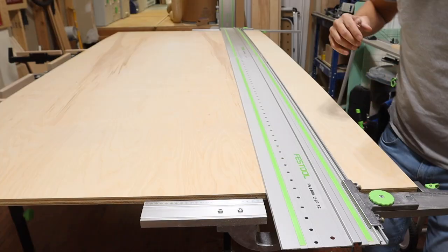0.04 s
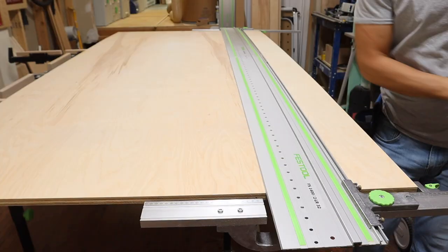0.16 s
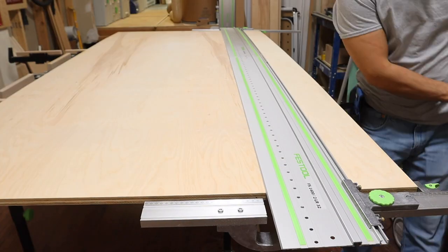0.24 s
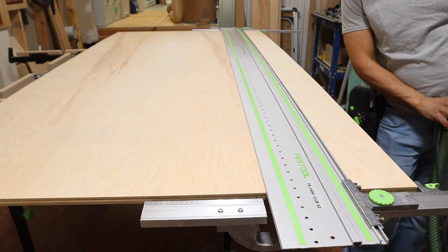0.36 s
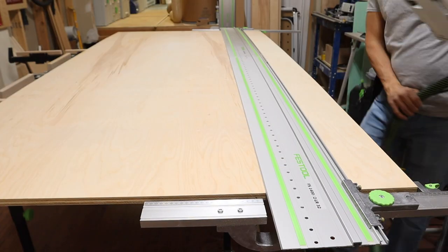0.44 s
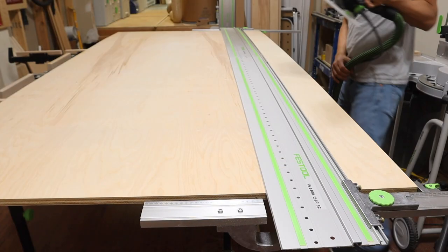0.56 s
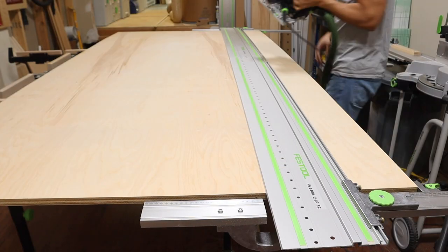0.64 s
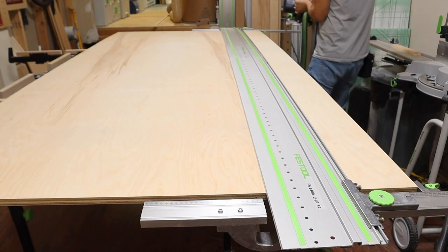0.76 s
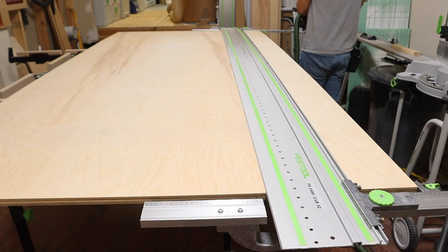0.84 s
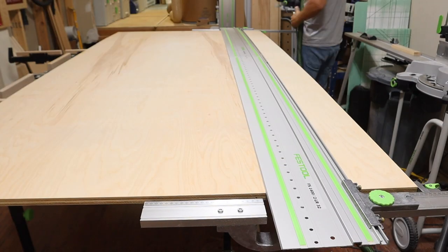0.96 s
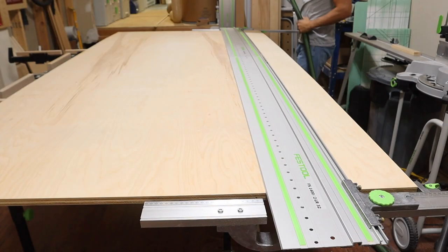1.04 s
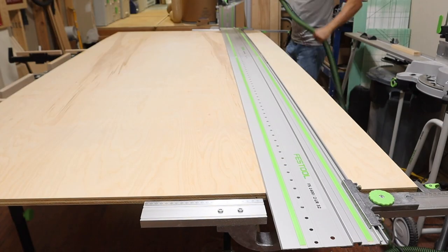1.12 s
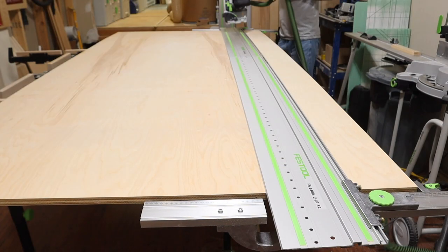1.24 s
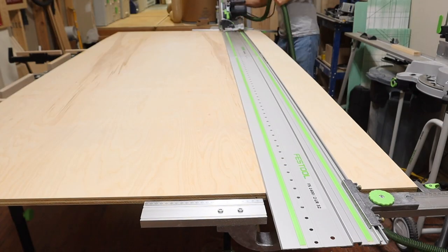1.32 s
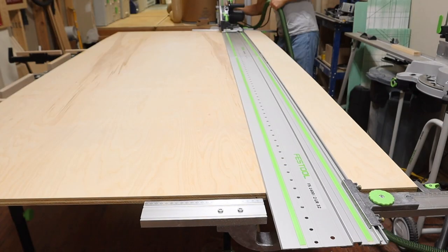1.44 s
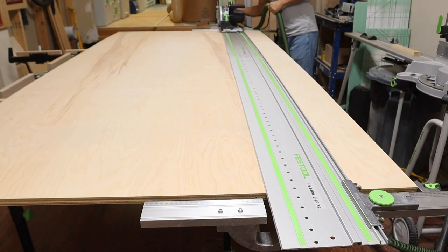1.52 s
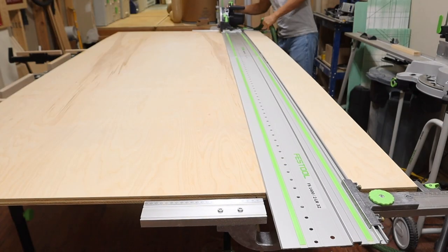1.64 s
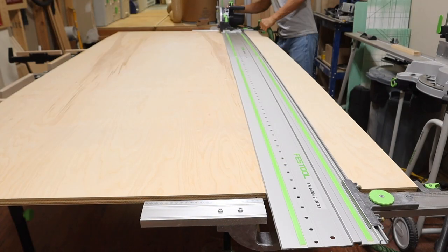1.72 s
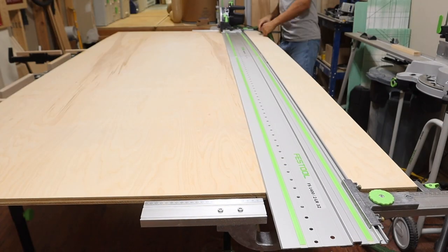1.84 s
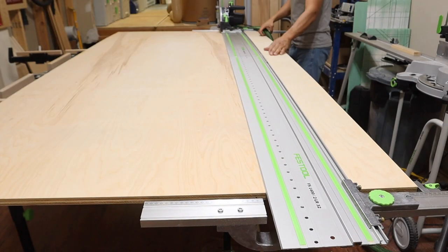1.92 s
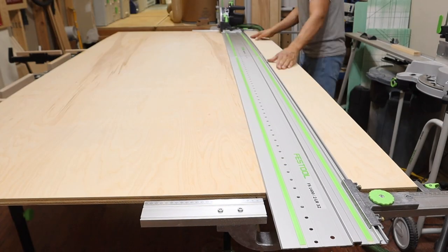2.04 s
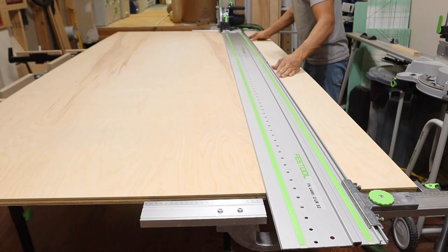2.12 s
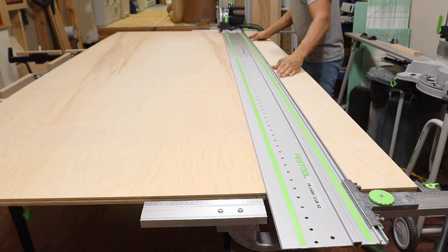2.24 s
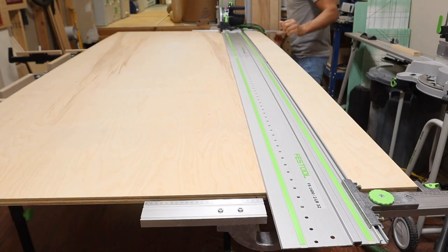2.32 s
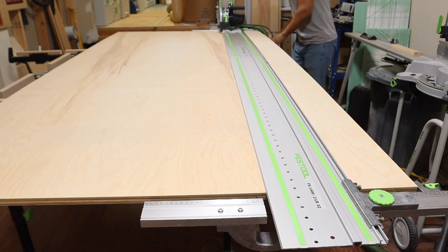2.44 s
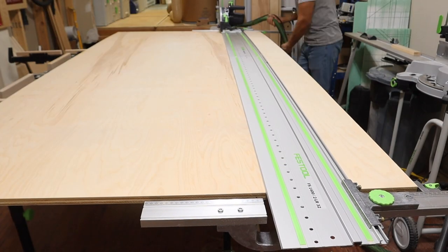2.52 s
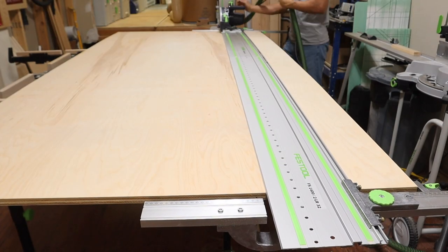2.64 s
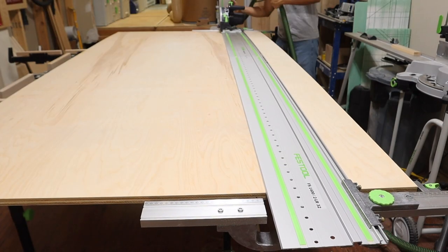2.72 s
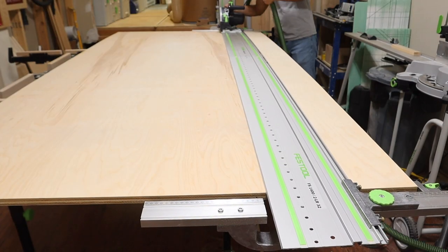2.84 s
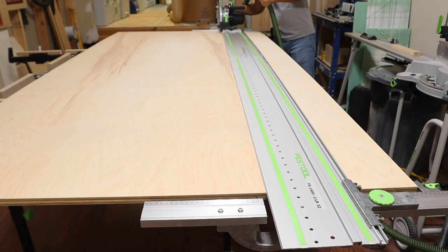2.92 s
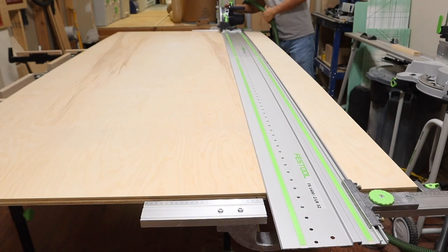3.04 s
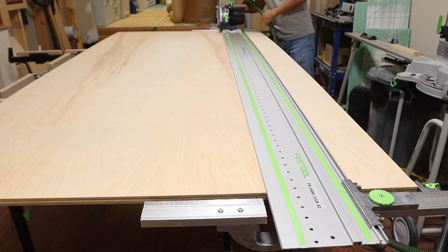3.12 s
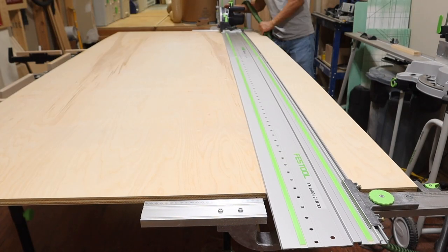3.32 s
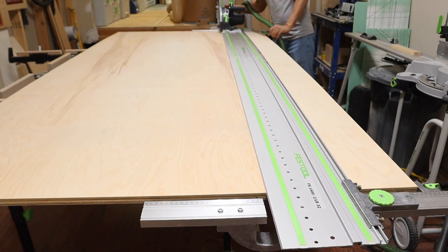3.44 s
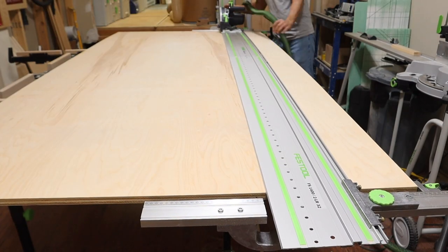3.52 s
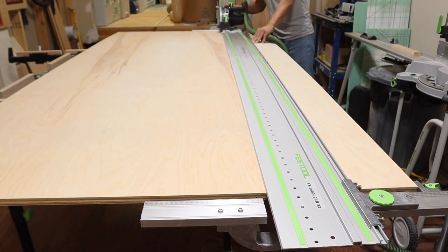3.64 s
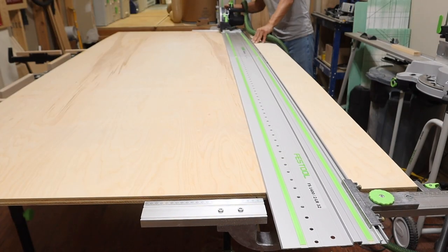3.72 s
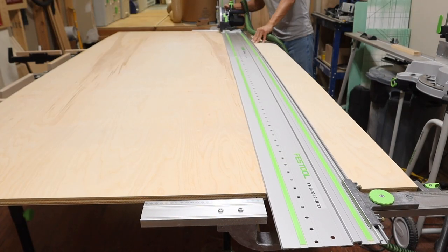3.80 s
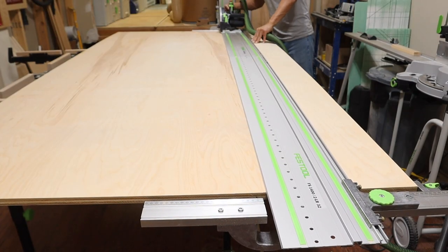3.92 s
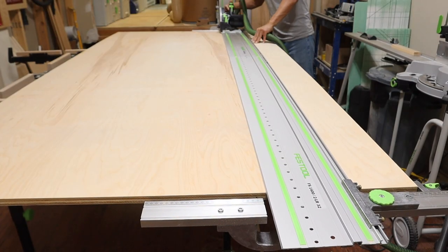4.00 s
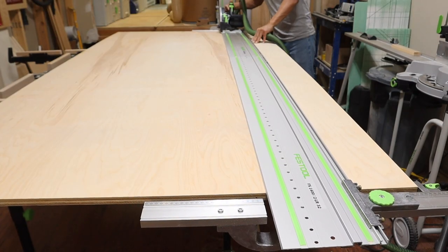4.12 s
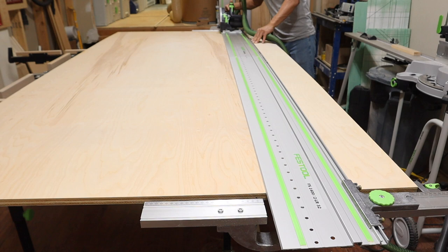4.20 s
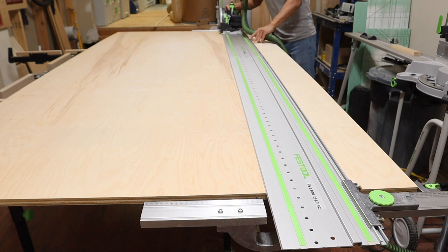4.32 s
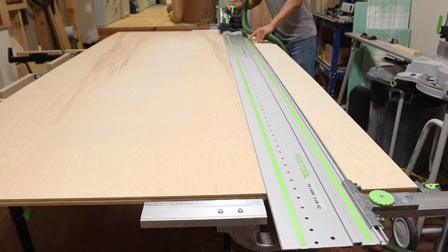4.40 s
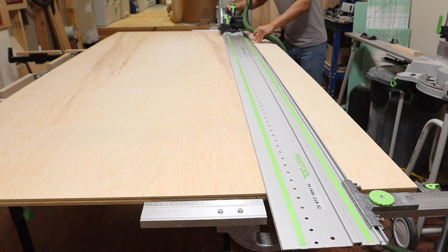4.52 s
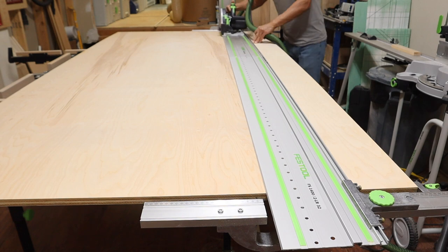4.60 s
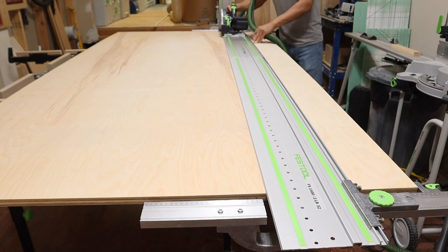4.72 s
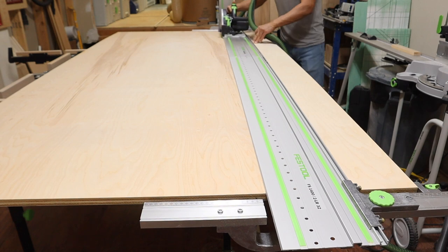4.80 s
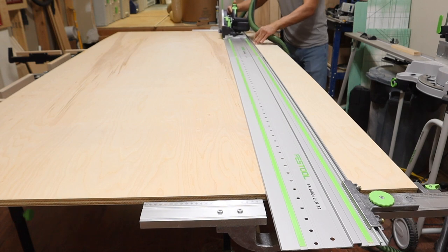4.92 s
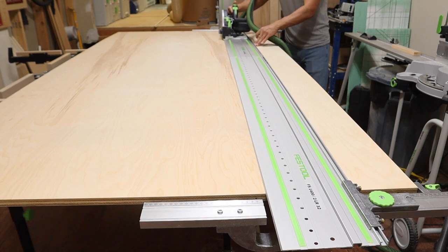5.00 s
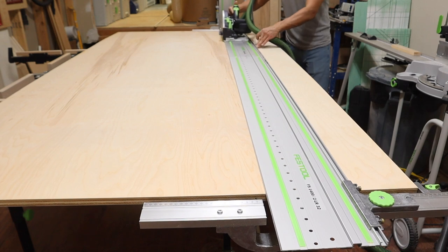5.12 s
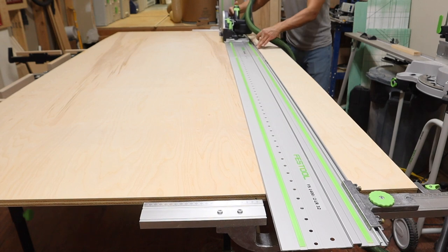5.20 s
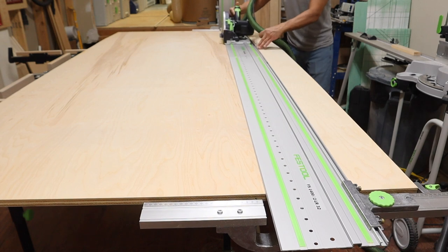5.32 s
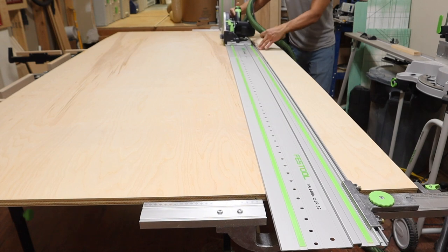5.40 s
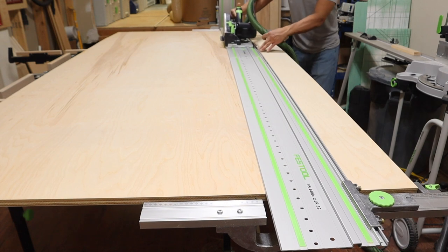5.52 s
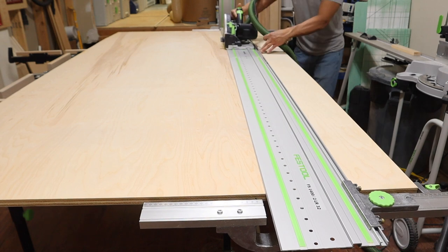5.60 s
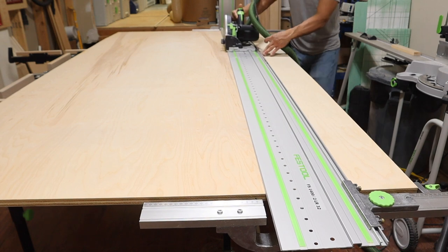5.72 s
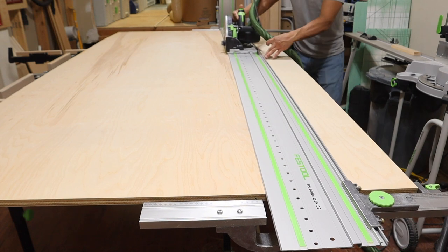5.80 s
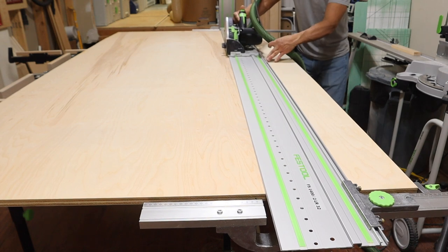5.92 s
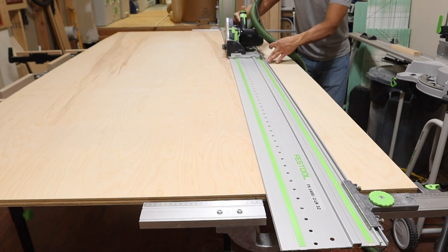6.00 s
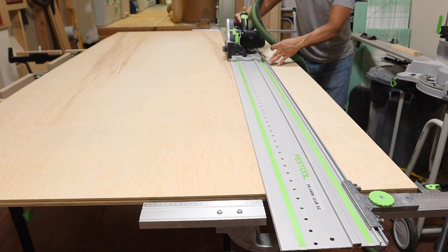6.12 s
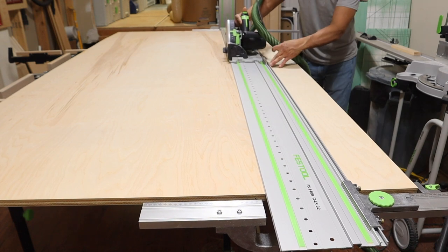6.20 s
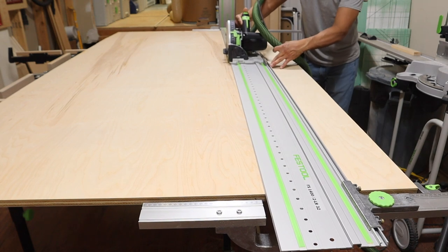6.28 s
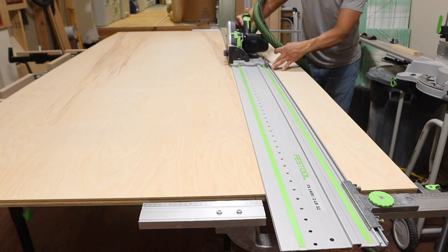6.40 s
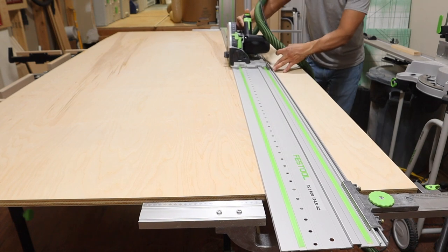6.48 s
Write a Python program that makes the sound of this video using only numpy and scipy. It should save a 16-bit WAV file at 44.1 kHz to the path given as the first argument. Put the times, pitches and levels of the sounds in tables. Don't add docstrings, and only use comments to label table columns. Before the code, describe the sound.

A quiet indoor workshop, short reverberation, faint steady fan hum, almost mono. From 0 to 1.2 s cloth and hose rustle with scattered dry ticks, a sharper metallic click at 0.3 s and small taps around 0.4 to 1.0 s. At 1.2 s a tiny, high rubber shoe squeak. Contacts of a saw base follow from 1.3 s, then the loudest blow at 1.64 s, a hollow clack of metal rail and board. Softer hand slides and knocks continue, with a tap at 2.0 s, sparse ticks and a latch click near 3.05 s. At about 3.15 s the saw bursts on: a rattling electric buzz, broad rushing air and gear whine rising until roughly 3.5 s. Air puffs thump the microphone from 3.6 to 4.0 s. The bright roar holds with wavering extractor whistle; the rattle drops back around 4.5 s, leaving whine and air, and returns at 6.3 s, still running at 6.5 s.

```python
import sys
import numpy as np
from scipy import signal
from scipy.fft import rfft, irfft, next_fast_len
from scipy.io import wavfile
from scipy.ndimage import uniform_filter1d

SR = 44100
rng = np.random.default_rng(int(sys.argv[2]) if len(sys.argv) > 2 else 0)


def wav_record(signal):
    frames = np.transpose(np.atleast_2d(signal))
    bounded = np.clip(frames, -1, 1)
    quanta = np.round(bounded * 32767).astype(np.int16)
    wavfile.write(sys.argv[1], SR, quanta)


def level_to_linear(level):
    exponent = np.asarray(level, float) / 20
    return 10 ** exponent


N = 288855
TIME = np.arange(N) / SR
SLOW = 40


def rms_one(x):
    return x / np.sqrt(np.mean(x ** 2) + 1e-20)


def in_time(rows):
    s, *columns = np.transpose(rows)
    inside = np.clip(np.minimum(TIME - s[0], s[-1] + .005 - TIME) / .005, 0, 1)
    return [np.interp(TIME, s, column) for column in columns] + [inside]


def fill(slow):
    return np.interp(TIME, np.arange(len(slow)) * SLOW / SR, slow)


def slow_chance(rate):
    r = np.exp(-2 * SLOW * np.pi * rate / SR)
    settle = 2000
    noise = rng.standard_normal(N // SLOW + 2 + settle)
    return rms_one(signal.lfilter([1], [1, -2 * r, r * r], noise)[settle:])


def drift(rate):
    return fill(slow_chance(rate))


def bumps(t, s, length):
    return np.cos(np.pi * np.clip((t - s[:, None]) / length[:, None], -.5, .5)) ** 2


def swells(rows):
    s, length, *heights = np.transpose(rows)
    shape = bumps(TIME[::SLOW], s, length)
    return [fill(height @ shape) for height in heights]


def band(x, low_hz, high_hz):
    return signal.sosfilt(signal.butter(2, [low_hz, min(high_hz, .45 * SR)], "band", fs=SR, output="sos"), x)


def coloured(x, spectrum):
    hz, level_db = np.transpose(spectrum)
    size = 2 * next_fast_len(N // 2 + 1)
    grid = np.maximum(np.arange(size // 2 + 1) * SR / size, 1)
    gain = level_to_linear(np.interp(np.log(grid), np.log(hz), level_db))
    return rms_one(irfft(rfft(x, size) * gain, size)[:N])


def resonance(x, hz, width):
    r = np.exp(-np.pi * width / SR)
    poles = [1, -2 * r * np.cos(2 * np.pi * hz / SR), r * r]
    return signal.lfilter((1 - r * r) / 2 * np.array([1, 0, -1]), poles, x)


def tone(hz, waver, flutter_db):
    phase = 2 * np.pi / SR * np.cumsum(hz * fill(1 + waver * slow_chance(37.9)))
    return np.sin(phase) * fill(np.sqrt(2) * level_to_linear(flutter_db * slow_chance(34.4)))


def patchy(x, depth_db):
    hz, _, spectra = signal.stft(x, SR, nperseg=2048)
    field = rng.standard_normal(spectra.shape)
    lasting = uniform_filter1d(field[:, :1], size=3, axis=0)
    fleeting = uniform_filter1d(uniform_filter1d(field, size=3, axis=0), size=20, axis=1)
    gain = level_to_linear(depth_db * (rms_one(lasting) + .7 * rms_one(fleeting)) * (hz[:, None] > 700))
    return rms_one(signal.istft(spectra * gain, nperseg=2048)[1][:N])


# frequency in Hz, level in dB per Hz.
RUSH_COLOUR = [(35, -72), (60, -39.5), (540, -27), (636, -15.5), (803, -19.5), (1580, -15), (1700, -16),
               (1820, -10), (2710, -6), (3420, -4), (3760, -2.5), (4970, -4.5), (5460, -6.5), (8920, -2),
               (16000, -6)]
# centre in seconds, length in seconds, change in dB.
BODY_SHADE = [(3.19, 0.47, 1), (3.71, 0.3, -1), (4.21, 0.14, -0.5), (4.63, 1, -1), (6.25, 0.12, -0.5)]


def air_rush(effort_db):
    on_s, rise_db_per_s, spin_up_s = 3.146, 1506, 0.19
    level_db = -38.5 + 0.05 * effort_db + swells(BODY_SHADE)[0]
    level_db -= rise_db_per_s * np.maximum(on_s - TIME, 0)
    rush = patchy(coloured(rng.standard_normal(N), RUSH_COLOUR), depth_db=1.5)
    rush = level_to_linear(level_db + 4.5 + .5 * drift(28.0)) * rush
    middle = band(rush, 300, 19800)
    return middle + (rush - middle) * np.clip((TIME - on_s) / spin_up_s, .1, 1)


BUZZ_HZ = 635.2
# frequency in Hz, width in Hz, level in dB.
HOUSING = [(776, 84, -7.5), (1228, 113, -8.5), (2100, 210, -8.5), (3670, 690, -6), (5100, 3100, -9.5),
           (6480, 1600, -5), (7560, 680, -8), (10600, 2100, -36)]
# frequency in Hz, width in Hz, level in dB.
BLADE_GUARD = [(3490, 90, -10), (5445, 30, -4), (5548, 22, -2), (5920, 50, -2), (6160, 50, -8),
               (6497, 40, -2), (6864, 30, -2), (7012, 45, -2), (7425, 20, 4), (7634, 40, 4), (7764, 35, 0),
               (8317, 35, -3)]
# frequency in Hz, width in Hz, level in dB.
SWITCH_ON = [(7430, 69, 5), (2100, 54, -5), (850, 87, -7)]
# multiple of the buzz, level in dB.
RATTLE_ORDERS = [(3, -29), (8, -21), (12, -26)]


def housing_rattle():
    pulses = 1 + .6 * np.cos(2 * np.pi * BUZZ_HZ * TIME)
    sparks = pulses * rng.standard_normal(N) * level_to_linear(.6 * drift(60))
    rattle = np.zeros(N)
    for k, (hz, width, db) in enumerate(HOUSING):
        rattle += level_to_linear(db) * resonance(np.roll(sparks, 977 * k), hz, width)
    other_sparks = sparks[::-1]
    rattle += sum(level_to_linear(db + 4.5) * resonance(other_sparks, hz, width) for hz, width, db in BLADE_GUARD)
    surge = sum(level_to_linear(db) * resonance(other_sparks, hz, width) for hz, width, db in SWITCH_ON)
    surge_fade_s = 0.045
    rattle += surge * np.exp(-np.maximum(TIME - 3.25, 0) / surge_fade_s)
    rattle = rms_one(band(band(rattle, 550, 19500), 590, 21000))
    return rattle + sum(level_to_linear(db) * tone(k * BUZZ_HZ, .0007, 2.5) for k, db in RATTLE_ORDERS)


# centre in seconds, length in seconds, tone in dB, octave in dB.
BUZZ_NODES = [(3.14, 0.08, -27, 14), (3.24, 0.25, -4, 0), (3.36, 0.54, -10, 3), (3.51, 0.16, -5.5, -14),
              (3.63, 0.27, -5.5, 9.5), (3.71, 0.14, -1.5, -24), (3.78, 0.16, -5, 8), (3.85, 0.049, 4, 4),
              (3.93, 0.065, 7, 1), (4.02, 0.51, -13.5, 2), (4.04, 0.063, 4, -7), (4.145, 0.19, -2, 13.5),
              (4.22, 0.28, -4.5, -5), (4.49, 0.12, 3.5, 7.5), (4.68, 0.49, -5.5, 0), (4.84, 0.46, 4, -4),
              (5.05, 0.36, 4.5, 0), (5.145, .1, -3, 2), (5.38, 0.53, -7, -13), (5.72, 0.85, 6.5, -10),
              (6.1, 0.43, 1, -2), (6.4, 0.47, -2.5, 3)]


def pulse_buzz(effort_db):
    tone_db, upper_db = swells(BUZZ_NODES)
    buzz_db = -54 + 0.92 * effort_db + tone_db
    octave_db = -59.5 + 0.5 * effort_db + upper_db
    flicker_db = drift(14)
    buzz = level_to_linear(buzz_db + flicker_db / 2) * np.sin(2 * np.pi * BUZZ_HZ * TIME)
    buzz += level_to_linear(octave_db - 4.0 + flicker_db) * tone(2 * BUZZ_HZ, 0.0025, 0.9)
    return np.sqrt(2) * buzz


# centre in seconds, length in seconds, frequency in Hz, width in Hz, change in dB.
MOVING_PATHS = [(3.127, 0.11, 12900, 4500, -18), (3.2, 0.25, 8400, 972, -3), (3.22, 0.12, 1450, 185.2, -1),
                (3.255, 0.24, 7770, 300, 4.5), (3.383, 0.65, 10970, 300, 5),
                (3.723, 0.91, 9000, 833.3, -0.5), (3.75, 0.33, 970, 199, -1.5), (3.98, .25, 12500, 500, 1),
                (3.986, .3, 2220, 120, 8), (4.0, 2.1, 1530, 200, 1), (4.01, 0.24, 2950, 200, 6),
                (4.295, .6, 14800, 906, 3.5), (4.307, 0.34, 1130, 110, 4), (4.35, .3, 8900, 150, 6),
                (4.376, 0.44, 8300, 463, 2.5), (4.4, 0.6, 6900, 450, 4), (4.7, 0.43, 11700, 900, -1),
                (4.85, 0.75, 15000, 300, 5), (4.858, 0.31, 1250, 90, 8), (5.09, 0.66, 7130, 400, 0.5),
                (5.1, 1, 6400, 200, 4), (5.107, 1.8, 1230, 160, 7), (5.2, 0.39, 10600, 555.6, 2),
                (5.3, 0.62, 8000, 405, 3), (5.44, 2.9, 1040, 203.7, -6), (5.505, 1.1, 8950, 250, 3.5),
                (5.51, 1.2, 2860, 90, 5), (5.622, 2.3, 3200, 110, 5.5), (5.65, .4, 11000, 250, 1),
                (5.7, 0.67, 1190, 110, 9.5), (5.82, .45, 12750, 300, 3), (6.1, 0.78, 9660, 400, -2.5),
                (6.157, .3, 11000, 250, 0), (6.2, .8, 9150, 200, 4), (6.21, 0.42, 3020, 79.3, 5),
                (6.302, 0.86, 2340, 270, -4), (6.404, 0.56, 7960, 300, 2.5), (6.41, .3, 14800, 300, -3),
                (6.423, 0.46, 6600, 350, 4), (6.433, 0.43, 1690, 120, 7)]


def moving_paths(x):
    hz, t, spectra = signal.stft(x, SR, nperseg=1024)
    s, length, centre_hz, width, db = np.transpose(MOVING_PATHS)
    when = bumps(t, s, length)
    where = db * np.exp(-((hz[:, None] - centre_hz) / width) ** 2)
    return signal.istft(spectra * level_to_linear(where @ when), nperseg=1024)[1][:N]


# time in seconds, level of the rattle in dB.
MOTOR_CURRENT = [(3.11, -105), (3.145, -45), (3.156, -33.5), (3.19, -30.5), (3.23, -32.5), (3.29, -37),
                 (3.5, -41.5), (4.02, -44), (4.07, -41), (4.2, -43), (4.3, -40.5), (4.52, -41.5),
                 (4.542, -51), (6.26, -55.5), (6.285, -41), (6.5, -41.5), (6.55, -46)]


def saw():
    current_db, inside = in_time(MOTOR_CURRENT)
    effort_db = current_db + 44.0
    noise = air_rush(effort_db) + level_to_linear(4.5 + current_db) * housing_rattle()
    return inside * (moving_paths(noise) + pulse_buzz(effort_db))


# time in seconds, pitch in Hz.
GEAR_RUN_UP = [(3.25, 4200), (3.295, 4680), (3.332, 4890), (3.375, 5060), (3.42, 5125)]
# time in seconds, pitch in Hz.
GEAR_AT_SPEED = [(3.47, 5170), (3.66, 5207), (3.88, 5209), (4.04, 5129), (4.2, 5200), (4.43, 5156),
                 (5.93, 5136), (6.48, 5164), (6.55, 5160)]
# multiple, level in dB.
GEAR_UPPER = [(4, -9), (5, -10), (6, -8), (7, -20)]
# centre in seconds, length in seconds, second in dB, third in dB.
MESH_SWELLS = [(3.48, 1, 0, 5), (3.82, 0.41, -1.5, -4), (3.93, 0.16, -6, 6), (4.24, 1, -2.5, 5),
               (4.65, 0.46, -1, 0.5), (5.1, 1, -1, 3), (5.62, 0.62, -1, -4), (5.8, 0.17, -0.5, 3),
               (5.98, 0.57, -2.5, -3.5), (6.2, 0.24, -2.5, 1), (6.48, 0.66, -3.5, 4.5)]
# centre in seconds, length in seconds, change in dB.
RISING_NODES = [(3.315, 0.05, 8), (3.357, 0.029, -3)]


def gear_whine():
    third_hz, inside = in_time(GEAR_RUN_UP + GEAR_AT_SPEED)
    hz = third_hz / 3
    full_speed_hz = 5160
    short = np.maximum(full_speed_hz - third_hz, 0) / 1000 * (TIME < 3.5)
    second_db, third_db = swells(MESH_SWELLS)
    level_db = -50 - 8 * short + swells(RISING_NODES)[0]
    second_db = -46.5 + second_db - 120 * short
    third_db = -46 + third_db - 180 * short
    upper = sum(level_to_linear(db) * tone(k * hz, 0.00086, 1.8) for k, db in GEAR_UPPER)
    whine = level_to_linear(level_db) * (tone(hz, 0.00097, 0.27) + upper)
    whine += level_to_linear(second_db) * tone(2 * hz, .0006, 2.5)
    whine += level_to_linear(third_db) * tone(3 * hz, .0007, 1.4)
    return inside * whine


# time in seconds, pitch in Hz, level in dB.
EXTRACTOR_PATH = [(3.35, 2189, -53), (3.4, 2223, -45), (3.48, 2256, -55), (3.76, 2255, -52),
                  (4.04, 2166, -49), (4.075, 2320, -60), (4.28, 2223, -47.5), (4.42, 2220, -54),
                  (4.57, 2251, -61), (4.78, 2240, -54.5), (5.3, 2257, -50.5), (5.5, 2215, -57),
                  (5.66, 2230, -50), (5.77, 2246, -58), (5.91, 2218, -62), (6.08, 2285, -52),
                  (6.3, 2250, -56.5), (6.55, 2240, -65)]
# multiple, level in dB.
EXTRACTOR_STACK = [(1, 0), (2, -3), (4, -13), (5, -17)]


def extractor_whistle():
    hz, level_db, inside = in_time(EXTRACTOR_PATH)
    stack = sum(level_to_linear(db) * tone(k * hz, .003, 2.2) for k, db in EXTRACTOR_STACK)
    return inside * level_to_linear(level_db) * stack


# time in seconds, pitch in Hz, level in dB.
CUFF_PATH = [(4.17, 1187, -70), (4.24, 1164, -55), (4.36, 1157, -58), (4.5, 1150, -63), (4.7, 1150, -63.5),
             (4.85, 1138, -70), (5.0, 1148, -59), (5.1, 1182, -60), (5.2, 1200, -63), (5.38, 1195, -66),
             (5.44, 1190, -72), (5.56, 1181, -65), (5.62, 1170, -59), (5.74, 1180, -62), (5.82, 1158, -56),
             (5.9, 1192, -64), (6.0, 1180, -71), (6.2, 1140, -67)]


def cuff_whistle():
    hz, level_db, inside = in_time(CUFF_PATH)
    return inside * level_to_linear(level_db) * tone(hz, .012, 3.0)


# pitch in Hz, start in seconds, end in seconds, level in dB, unsteadiness 0-1.
FAINT_TONES = [(1268, 3.13, 3.27, -48, .3), (1906, 6.27, 6.6, -58, .15), (1906, 4.3, 4.54, -60, .3),
               (3490, 3.14, 3.46, -48, .4), (1310, 3.88, 3.99, -56, .6), (2075, 3.42, 3.78, -51, .35),
               (2070, 3.75, 4.08, -56, .4), (1240, 5.08, 5.18, -59, .4), (1255, 4.8, 4.9, -59, .4),
               (2040, 5.3, 5.9, -62, .5), (4480, 5.2, 5.75, -54, .3), (2900, 6.05, 6.25, -54, .3),
               (2885, 4.6, 6.3, -58, .6), (465, 4.05, 4.5, -75, .4), (460, 5.4, 6.0, -78, .4),
               (8990, 5.35, 5.8, -53, .5), (11220, 3.4, 3.62, -54, .3), (12000, 3.95, 4.1, -55, .35),
               (462, 5.95, 6.6, -71, .2), (3505, 4.25, 5.6, -53, .3), (3490, 4.95, 5.3, -53, .4),
               (3530, 3.42, 4.2, -56, .4), (1841, 4.3, 6.2, -64, .25), (9300, 4.05, 4.2, -52, .3),
               (7800, 4.6, 6.55, -62, .6), (6480, 4.6, 6.55, -64, .5)]


def faint_tones():
    out = np.zeros(N)
    for hz, start, end, db, unsteady in FAINT_TONES:
        on = np.clip(np.minimum(TIME - start, end - TIME) / 0.026, 0, 1)
        wander = fill(1 + .012 * unsteady ** 2 * slow_chance(2.5))
        out += on * level_to_linear(db) * tone(hz * wander, 0.007 * unsteady, 3.5 * unsteady)
    return out


# frequency in Hz, level in dB per Hz.
PUFF_SPECTRUM = [(18, -46), (30, -20), (146, 0.5), (304, -8), (393, -6.5), (514, -17), (560, -16),
                 (730, -40), (1230, -120)]
# time of peak in seconds, level in dB.
AIR_GUSTS = [(3.617, -48), (3.678, -49), (3.71, -52), (3.78, -51.5), (3.822, -53), (3.98, -58.5),
             (4.023, -48.5), (4.065, -67), (4.19, -71)]


def puffs():
    rise_db_per_s, fall_db_per_s = 651, 384
    lumps = coloured(rng.standard_normal(N) * level_to_linear(1.9 * drift(52)), PUFF_SPECTRUM)
    gusts_db = [db - np.maximum(rise_db_per_s * (s - TIME), fall_db_per_s * (TIME - s)) for s, db in AIR_GUSTS]
    return level_to_linear(np.max(gusts_db, axis=0)) * lumps


# start in seconds, peak in dB, spread in seconds, ring in Hz.
HOSE_TAPS = [(0.0314, -57.5, 0.0011, 2620), (0.2108, -46.5, 0.00071, 2820), (1.11, -60, 0.0077, 3050),
             (0.592, -56, .002, 1500), (0.999, -52, 0.00079, 1800), (0.425, -44.5, 0.0006, 2600),
             (0.631, -54, 0.0027, 2850), (0.634, -52, 0.00099, 2840), (0.677, -48.5, 0.00091, 2840),
             (0.6898, -57, 0.013, 2830), (.719, -53, .0015, 2860), (0.856, -57.5, 0.014, 2840),
             (1.274, -56, 0.007, 4050), (1.345, -46.5, 0.0021, 3450), (2.116, -45, 0.002, 2240),
             (2.375, -64, 0.0042, 2860), (2.397, -54.5, 0.0019, 1900), (2.45, -49.5, 0.002, 2130),
             (2.966, -66, 0.0053, 2860), (3.022, -52, 0.001, 2900), (2.629, -65, 0.0057, 2100)]
# start in seconds, peak in dB, spread in seconds, ring in Hz.
METAL_TAPS = [(0.125, -58.5, 0.0038, 7540), (0.165, -55.5, 0.011, 2820), (0.3117, -35, 0.0013, 8500),
              (0.3466, -43, 0.0003, 3260), (.5916, -61, .0017, 2730), (0.928, -59.5, 0.0083, 2460),
              (1.0014, -56.5, 0.0036, 2300), (1.13, -61, 0.0049, 2410), (2.512, -61, 0.0062, 3520),
              (1.635, -51, 0.0025, 6100)]
# start in seconds, peak in dB, spread in seconds, ring in Hz.
RAIL_TAPS = [(.39, -48.5, 0.0033, 2870), (.7806, -58.5, 0.0054, 1850), (1.339, -62, 0.0014, 5100),
             (1.6434, -27, 0.0022, 2100), (2.0031, -41, 0.0015, 2470), (2.0323, -57, 0.011, 2230),
             (2.075, -52.5, 0.0068, 2680)]
# start in seconds, peak in dB, spread in seconds, ring in Hz.
PALM_TAPS = [(1.721, -50, 0.0061, 3670), (1.834, -65.5, 0.013, 3580), (1.978, -53.5, 0.023, 5500),
             (2.228, -80, 0.0048, 5850), (2.32, -77, 0.0088, 2620)]
# start in seconds, peak in dB, spread in seconds, ring in Hz.
WOOD_TAPS = [(1.311, -55, 0.00084, 2880), (1.571, -50.5, 0.0014, 2330), (1.7289, -47.5, 0.0034, 1960),
             (1.934, -58.5, 0.005, 3530), (2.708, -52, 0.00091, 2030)]
# start in seconds, peak in dB, spread in seconds, ring in Hz.
BASE_TAPS = [(1.423, -45, 0.0058, 3200), (1.496, -47, 0.0041, 2310), (1.553, -48, 0.0056, 3250)]
# start in seconds, peak in dB, spread in seconds, ring in Hz.
LATCH_TAPS = [(.871, -57, .0015, 2600), (2.457, -58, .005, 3500), (3.064, -52, 0.0012, 6450),
              (3.065, -58, .002, 14500)]
# start in seconds, peak in dB, spread in seconds, ring in
# Hz.
ADDED_RINGS = [(1.6436, -29, .003, 3400), (1.645, -33, .004, 6300), (.3115, -41, .003, 4700),
               (3.023, -55, .003, 2900), (1.6446, -30, .004, 1150), (1.731, -46, .004, 1250)]
# low share in dB, high share in dB.
TAP_SHARES = [(-27, -22), (-17.5, -0.5), (-9.5, -3), (-5.5, 4.5), (-8.5, -9.5), (-14, -2), (-21, -1.5),
              (-28, -31)]
# frequency in Hz, width in Hz, level in dB.
BOARD_MODES = [(630, 790, -1.5), (1270, 260, 0), (2240, 170, -8)]


def taps():
    kinds = HOSE_TAPS, METAL_TAPS, RAIL_TAPS, PALM_TAPS, WOOD_TAPS, BASE_TAPS, LATCH_TAPS, ADDED_RINGS
    tick_db, tick_spread_s = 15, .002
    push, ring = np.zeros((3, N)), np.zeros(N)
    span = TIME[:SR // 8]
    for kind, (low_db, high_db) in zip(kinds, TAP_SHARES):
        for s, peak_db, spread, hz in kind:
            x = span / spread
            release = np.exp(-x / 1.7) + 0.24 * np.exp(-span / 0.017)
            burst = level_to_linear(peak_db) * np.tanh(2.0 * x) * release * rng.standard_normal(len(span))
            burst[0] = level_to_linear(peak_db + tick_db) * np.exp(-(spread / tick_spread_s) ** 2)
            here = slice(round(s * SR), round(s * SR) + len(span))
            push[:, here] += level_to_linear(np.array([[low_db], [0], [high_db]])) * burst
            ring[here] += resonance(burst, hz, .14 * hz)
    low, mid, high = push + 1e-18
    board = sum(level_to_linear(db + 20.0) * resonance(low, hz, width) for hz, width, db in BOARD_MODES)
    crack = level_to_linear(-6.0) * band(low, 470, 840)
    crack += level_to_linear(0.5) * band(band(mid, 950, 4630), 880, 11000)
    crack += level_to_linear(3.0) * band(high, 2600, 11800)
    contact = board + crack + level_to_linear(8.0) * ring
    table_thud = level_to_linear(-11) * band(low, 150, 400)
    return table_thud + band(band(contact, 520, 19000), 520, 19000)


# time in seconds, pitch in Hz, level in dB.
SQUEAK_PATH = [(1.208, 4500, -60), (1.213, 4300, -48), (1.222, 4220, -45.5), (1.228, 4220, -36.5),
               (1.236, 4060, -36), (1.247, 4200, -35), (1.251, 4340, -40.5), (1.268, 4160, -45.5),
               (1.3, 4100, -88)]
# multiple, level in dB.
SQUEAK_STACK = [(1, -5), (2, -11.5), (3, -23)]


def squeak():
    hz, level_db, inside = in_time(SQUEAK_PATH)
    phase = 2 * np.pi * np.cumsum(hz * (1 + .007 * drift(140))) / SR
    stack = sum(level_to_linear(db) * np.sin(k * phase) for k, db in SQUEAK_STACK)
    return np.sqrt(2) * inside * level_to_linear(level_db + 1.9 * drift(120)) * stack


def grains(per_s, spread_db):
    sizes = level_to_linear(spread_db * np.minimum(rng.exponential(1, N), 4)) * rng.standard_normal(N)
    return sizes * (rng.random(N) < per_s / SR) + 1e-18


# time in seconds, level in dB.
RUB_EFFORT = [
    [(0, -95), (.158, -70), (.522, -73.5), (.65, -64.5), (.79, -81.5), (.9, -67), (1.134, -68),
     (1.344, -76), (1.4, -88)],
    [(1.4, -89), (1.608, -80.5), (1.764, -102), (2.028, -71.5), (2.146, -72.5), (2.185, -76.5),
     (2.21, -103)],
    [(2.21, -100), (2.368, -84.5), (2.586, -85), (2.836, -88), (3.054, -99), (3.12, -83)],
]
RUB_BRIGHT_DB = [1, 14, 9.5]
# frequency in Hz, level in dB per Hz.
RUB_MIDDLE = [(410, -63), (700, -18.5), (851, -8.5), (1280, -28), (1490, -11), (2200, -4), (2500, 2),
              (2900, -3), (3500, -4.5), (4120, -7), (6500, -11.5), (8450, -32.5), (14300, -120)]
# frequency in Hz, level in dB per Hz.
RUB_TREBLE = [(3000, -20), (5000, -5), (7100, -2), (9000, 1), (12000, -2), (15000, 0.5), (17000, 6.5)]


def rustle():
    clumps = level_to_linear(2.0 * drift(25))
    mid = coloured(grains(2000, 2.2) * clumps * level_to_linear(2.0 * drift(40)), RUB_MIDDLE)
    high = coloured(grains(12000, 2.5) * clumps, RUB_TREBLE)
    out = np.zeros(N)
    for stroke, bright_db in zip(RUB_EFFORT, RUB_BRIGHT_DB):
        db, inside = in_time(stroke)
        treble_db = bright_db + 0.15 * (db + 74.5)
        out += inside * level_to_linear(db) * (mid + level_to_linear(treble_db) * high)
    return out


def shop(x):
    t60_s, tail_db = 0.079, 1
    t = TIME[:SR // 3]
    noise = rng.standard_normal(len(t))
    mid_noise = band(noise, 320, 4500)
    tail = mid_noise * level_to_linear(-60 * t / t60_s) + (noise - mid_noise) * level_to_linear(-60 * t / (1.09 * t60_s))
    return x + level_to_linear(tail_db) * signal.fftconvolve(x, tail / np.sqrt(np.sum(tail ** 2)))[:N]


# frequency in Hz, level in dB.
FAN_HUM = [(306.8, -73.5), (635.2, -80), (1168, -91), (1238, -100), (1540, -89.5)]
# frequency in Hz, level in dB per Hz.
ROOM_AIR = [(18, -33.5), (30, 17), (56, -25.5), (239, -18), (303, -8), (404, -17), (569, -16.5), (632, -7),
            (702, -16.5), (1540, -18), (2480, -24), (2980, -20.5), (16000, -43)]


def background():
    hum = sum(level_to_linear(db) * tone(hz, 0.00023, 0.31) for hz, db in FAN_HUM)
    air = band(band(coloured(rng.standard_normal(N), ROOM_AIR), 93.8, 18950), 71.7, 18950)
    duck_db = -7.5 * np.clip((TIME - 3.15) / 0.66, 0, 1)
    return (hum + level_to_linear(-70.5) * air) * level_to_linear(duck_db)


def scene():
    contacts, rubber = taps() / 2, squeak()
    machine = saw() + gear_whine() + extractor_whistle() + cuff_whistle() + faint_tones()
    handling = contacts + rubber + shop(contacts + level_to_linear(-1) * rubber + rustle())
    mono = handling + machine + puffs() + background()
    mono = signal.sosfilt(signal.ellip(12, .5, 60, 15950, fs=SR, output="sos"), mono)
    return np.array([mono, mono])


# centre in seconds, low edge in Hz, high edge in Hz.
SIDE_PATCHES = [(4.563, 5150, 6300), (4.749, 8250, 9700), (4.842, 8900, 12500), (4.865, 6850, 8300),
                (5.097, 5150, 6900), (5.143, 5150, 6300), (5.329, 8250, 9700), (5.329, 11000, 12500),
                (5.329, 13750, 16000), (5.376, 10300, 11750), (5.445, 8900, 11750), (5.608, 10300, 11750),
                (5.608, 14450, 16000), (5.956, 8900, 11100), (6.304, 14450, 16000), (6.351, 7550, 9000),
                (6.467, 5150, 6300), (6.467, 12350, 13850)]


def differing_sides(dry):
    out, size = dry.copy(), 2048
    hz = np.arange(size // 2 + 1) * SR / size
    window = np.sin(np.pi * np.arange(size) / size) ** 2
    for s, low_hz, high_hz in SIDE_PATCHES:
        at = round(s * SR) - size // 2
        part = rfft(dry[0, at:at + size]) * (hz > low_hz) * (hz < high_hz)
        other = irfft(part * np.exp(2j * np.pi * rng.random(len(hz))), size)
        out[:, at:at + size] += window * (0.66 * other * [[1], [-1]] - 0.4 * irfft(part, size))
    return out


def top_cut(x):
    return signal.sosfilt(signal.butter(12, 17030, fs=SR, output="sos"), x)


def record(dry):
    mix = differing_sides(dry)
    return top_cut(mix)


dry = scene()
out = record(dry)
wav_record(out)
```